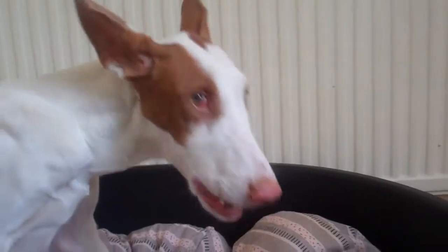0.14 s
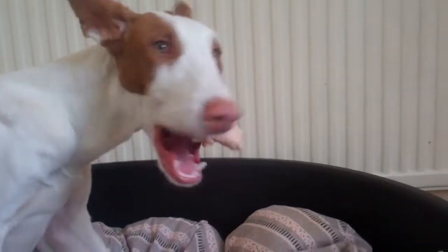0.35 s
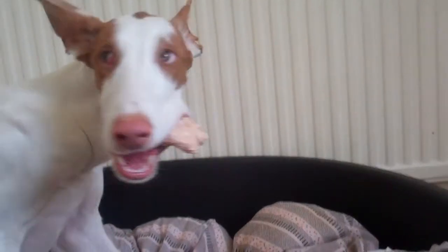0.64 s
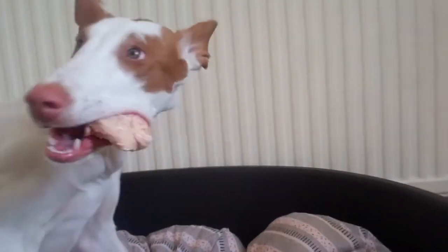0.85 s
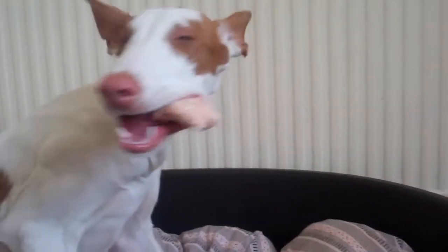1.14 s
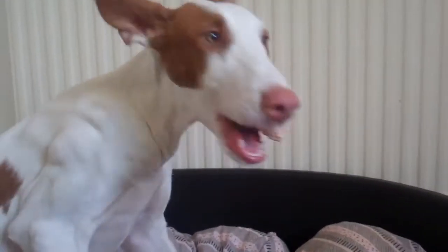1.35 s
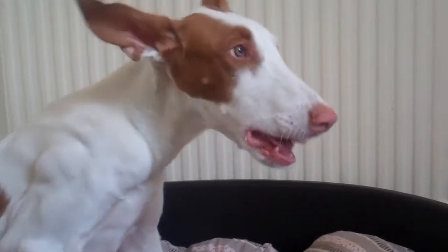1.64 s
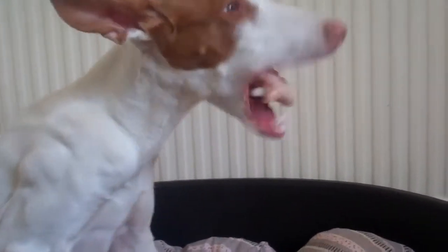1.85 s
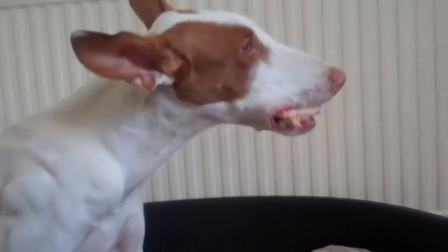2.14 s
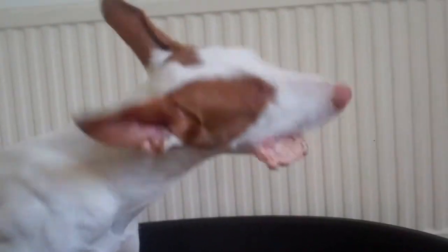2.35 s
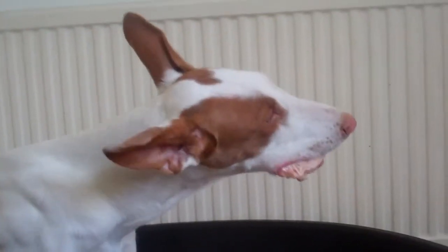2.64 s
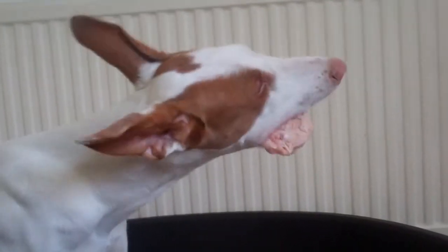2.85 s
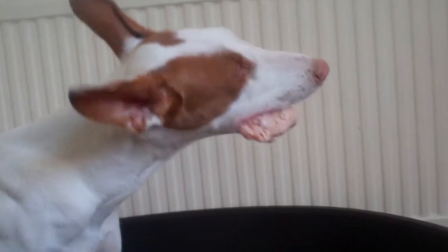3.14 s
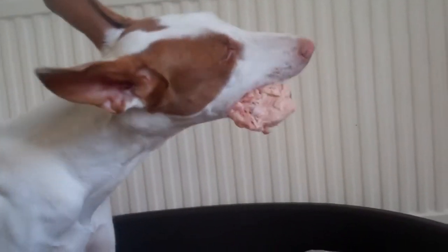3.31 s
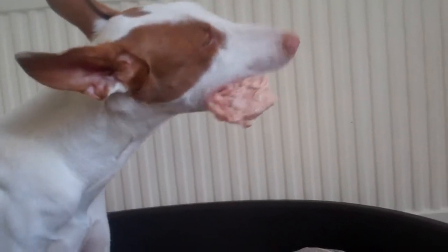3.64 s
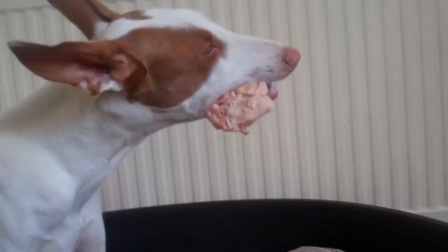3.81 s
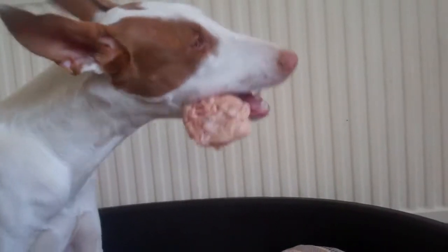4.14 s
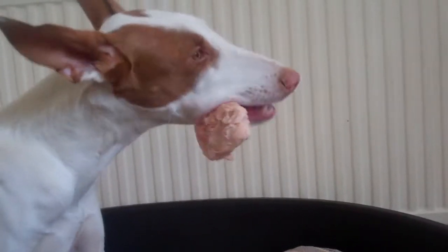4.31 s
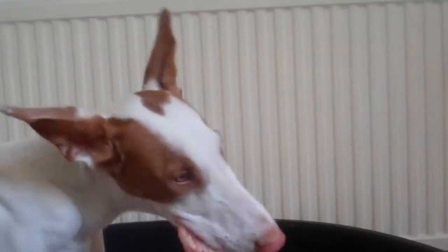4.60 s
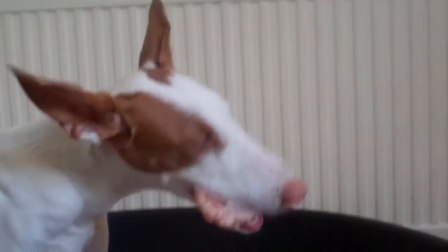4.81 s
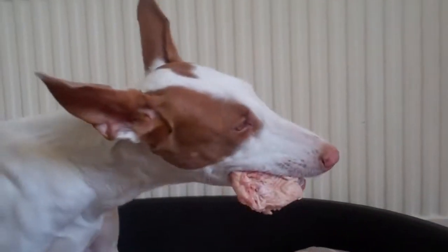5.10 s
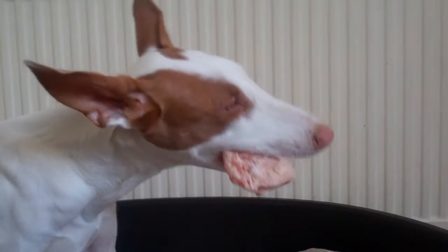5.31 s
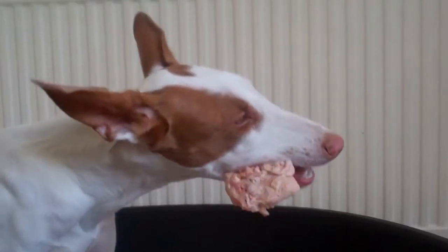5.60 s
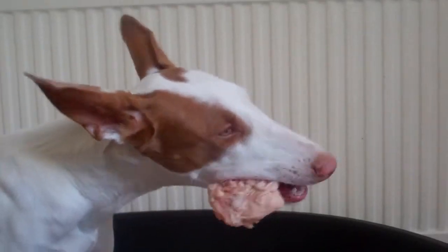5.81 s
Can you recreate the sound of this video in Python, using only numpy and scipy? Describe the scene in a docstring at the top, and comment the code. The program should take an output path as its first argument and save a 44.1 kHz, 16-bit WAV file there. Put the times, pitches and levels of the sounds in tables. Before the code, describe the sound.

A dog gnaws a hard frozen lump of meat, with scattered sharp cracks, small clicks, soft bedding rustle and one loud snap near the end.

```python
"""A dog in its plastic bed gnaws a lump of frozen meat, close to a small stereo camera in a living room.
Each bite is a burst of tiny breaks that rings the lump, its splinters and the mouth; the room answers briefly.
Bedding rustles as shaped noise and ticks, paws ring the bed's low modes and scrape its plastic,
and a hand rumbles on the camera. Underneath lie a faint mains hum and a steady hiss."""
import sys
import numpy as np
from scipy import signal
from scipy.fft import rfft, irfft, next_fast_len
from scipy.io import wavfile
from scipy.ndimage import uniform_filter1d

SR = 44100
rng = np.random.default_rng(int(sys.argv[2]) if len(sys.argv) > 2 else 0)


def store_pcm(level_fs):
    """Save levels as 16-bit WAV."""
    pcm = np.round(np.clip(level_fs, -1, 1) * 32767).astype(np.int16)
    wavfile.write(sys.argv[1], SR, np.atleast_2d(pcm).T)


N = 262836
T = np.arange(N) / SR  # time in seconds

# Bites that crack the lump or only knock on it.
# Each row: start in seconds, level in dB (before the overall level in bites), mouth thud in dB next to the lump,
# splinters in dB next to the lump, ring of the broken fragment in dB next to the lump,
# pitch of the fragment in Hz, pitch of the splinters in Hz, pitch of the mouth in Hz,
# crumbling time in seconds, level sent to the room in dB next to the crack.
BITES = [ (0.0296, -27.5, -15, 4, 1, 5400, 10100, 694, .0016, -8),
         (0.0303, -29.5, 3.5, -6, 5, 2400, 4500, 710, 0.0023, -8.5),
         (0.0331, -36, -7, -2, -1, 5400, 5400, 720, 0.0018, -6),
         (0.5361, -25.5, -32, -1.5, 4, 7040, 7200, 790, .0006, -13.5),
         (0.5372, -25, -27, -2, 12, 2930, 3100, 790, 0.00079, -13),
         (0.5386, -28.5, -10.5, -1, 8, 1630, 7700, 790, .0008, -13),
         (0.645, -43.5, -16, -14, 7, 5600, 6000, 790, 0.0015, -16),
         (0.775, -52, -15, 6, 0, 3200, 9000, 790, .003, -24),
         (0.7824, -43.5, -18, -7, 5, 6040, 6200, 790, .0008, -11),
         (0.7928, -47, -18, 11, 1, 4500, 11700, 790, .001, -11),
         (0.829, -40.5, -9, -3, 4, 2900, 4800, 790, .001, -21),
         (0.8302, -41, -16, 2, 6, 4750, 10500, 790, .001, -14),
         (0.8837, -54, 14, -10, 0, 1800, 4000, 260, .001, -16),
         (1.3512, -46.5, -3, 13.5, 6, 5600, 10300, 790, .0008, -2.5),
         (2.8017, -46.5, -24, 7.5, -3, 6540, 7000, 790, .001, 0),
         (2.8478, -46.5, 1.5, 7, -2, 2100, 4000, 855, .001, -2),
         (2.886, -44, -6, -8, 8, 2900, 4000, 790, .0033, -16),
         (3.2789, -36.5, 1.5, -14, 5, 1830, 3000, 970, 0.0035, -4.5),
         (3.287, -38, -10, -9, 2, 2880, 4500, 900, 0.0028, -12),
         (3.4214, -51.5, 14, -10, 0, 1800, 4000, 280, 0.0011, -10),
         (3.766, -40, -5, -9, 5, 1680, 9100, 905, .006, -7),
         (3.777, -43.5, -10, 7.5, 0, 3500, 9150, 900, 0.0096, -2),
         (3.8783, -37, -0.5, -2, -1, 3900, 4200, 960, .003, -4),
         (4.1628, -36, -5, -1, -5, 2380, 4300, 704, .0006, -3),
         (4.168, -30.5, -7.5, -9, -6, 2360, 3600, 806, 0.0089, -5),
         (4.191, -41.5, 8, -12, 4, 3150, 3500, 990, .004, -9),
         (4.273, -42.5, 10.5, -8, -2, 1840, 3000, 800, .0015, -1),
         (4.2937, -32.5, 12.5, -11, 3, 1490, 5000, 840, 0.0014, -7.5),
         (4.297, -28, -3, -11, -1, 1790, 5500, 830, 0.0022, -6),
         (4.3065, -35, 1.5, -11, -7, 1000, 4000, 885, 0.00089, -1),
         (4.3108, -36, 9.5, -9, 1, 1100, 4000, 950, 0.0009, -13),
         (4.316, -37, 5, -13, 2, 1800, 4000, 940, 0.00086, -8),
         (4.498, -47, 0, 5, 3, 2700, 8000, 790, .005, -4),
         (4.5062, -36, -6, 1.5, 10, 4270, 12000, 800, .0005, -8),
         (5.3745, -32.5, -17, -1, 0, 3300, 3500, 900, 0.00077, -17),
         (5.377, -31.5, -18, -21, 3, 2160, 8000, 900, 0.0011, -14),
         (5.3952, -43, -.5, 15.5, 3, 4130, 11500, 760, 0.0016, -10),
         (5.4007, -51, -8, 12, 0, 4500, 11500, 790, .002, -11),
         (5.412, -42.5, -10, -2, 0, 3600, 6000, 790, .002, -3),
         (5.49, -39, -21, -2, 2, 2170, 9000, 790, 0.0022, -16),
         (5.5022, -35, -35, 11.5, 2, 2600, 8400, 790, 0.00017, -11.5),
         (5.5042, -29, -25, -2, 11, 3370, 7300, 790, 0.0015, -12),
         (5.5279, -16.5, -3.5, 2, -5, 4400, 5950, 580, 0.00078, -6),
         (5.529, -19.5, -2, 2, -1, 2190, 5800, 830, 0.0027, -4),
         (5.5314, -28, -5, -7, 2, 1570, 4300, 980, 0.012, 6),
         (5.911, -36, 3, -5, 0, 3100, 5600, 790, .0023, -18),
         (5.926, -36.5, 6, 9, 3, 4520, 10600, 795, .0012, -24),
         (5.9385, -36.5, 6.5, -13, 0, 3200, 4000, 900, 0.0012, -8),
         (5.9457, -36, 7, -12, 3, 3410, 4000, 705, .002, -8),
         (5.9491, -41, 9, -14, 0, 1700, 4000, 910, .001, -10),
         (5.9535, -43, 11, -14, 0, 1390, 4000, 720, .001, -8)]
# How unlike a crack sounds at the two microphone ports. Each row: frequency in Hz, level in dB.
SIDEWAYS_COLOUR = [(500, -35), (2000, -35), (5000, -23), (9000, -9)]


def bites(level_db=-14, count=4):
    """Each crack sounds different in every direction: one reaches the camera, the others the walls."""
    front, aside, sent = np.zeros((3, N))
    for start_s, db, *shape, room_db in BITES:
        ways = [undb(db + level_db) * crack(*shape) for _ in range(count)]
        add(front, start_s, ways[0])
        add(aside, start_s + .0002, ways[1])
        for way in ways[1:]:
            add(sent, start_s, undb(room_db) * way / np.sqrt(count - 1))
    side = colour(aside, SIDEWAYS_COLOUR)
    return np.array([front + side, front - side]) + room(sent)


# The mouth around the lump, retuned by the jaw at every bite.
# Each row: multiple of the mouth's pitch, width in Hz, level in dB.
MOUTH_MODES = [(.25, 218, -9), (.7, 237, -7.5), (1, 165, 7), (1.2, 160, -11)]
# The frozen lump and the teeth. Each row: pitch in Hz before the grip shifts it, width in Hz, level in dB.
LUMP_MODES = [(1770, 120, 5.5), (2470, 570, 14), (3250, 900, 2.5), (4250, 1400, 2), (6060, 510, -6.5)]
# The crackle of the splinters. Each row: frequency in Hz, level in dB.
SPLINTER_COLOUR = [(2500, -25.5), (5000, -2), (6800, 0.5), (8000, 0.5), (10000, 0), (12400, 2)]
FRAGMENT_Q = 6  # sharpness: with the same Q, higher fragments ring more briefly
FLESH_HZ = 2100  # flesh softens the blow above this pitch
SPLINTER_RING_DB = -10.5  # the splinters' ring next to their crackle


def crack(thud_db, splinter_db, fragment_db, fragment_hz, splinter_hz, mouth_hz, crumble_s, size=2048):
    """One fracture sets off a dying run of smaller ones; they ring lump, fragment, splinters and mouth."""
    t = np.arange(size) / SR
    flips = rng.choice([-1, 1], size)
    keep = rng.random(size) < .3
    run = flips * keep * np.exp(-t / crumble_s)
    first = signal.unit_impulse(size)
    breaks = first + .4 * run

    # the teeth hold the lump differently each time
    grip = 1 + 0.064 * rng.uniform(-0.29, 1, len(LUMP_MODES))
    gripped = [(hz * shift, width, db) for (hz, width, db), shift in zip(LUMP_MODES, grip)]
    fragment = ring(breaks, [(fragment_hz, fragment_hz / FRAGMENT_Q, 0)])
    lump = unit(ring(breaks, gripped)) + undb(fragment_db) * unit(fragment)

    # the jaw mostly feels the first break, softened
    felt = first + .1 * run
    felt = signal.sosfilt(signal.butter(2, FLESH_HZ, fs=SR, output="sos"), felt)
    mouth_modes = [(multiple * mouth_hz, width, db) for multiple, width, db in MOUTH_MODES]
    mouth = undb(thud_db) * unit(ring(felt, mouth_modes))

    # the treble is spent sooner
    shards = first + 0.6 * run * np.exp(-t / (1.3 * crumble_s))
    crackle = unit(colour(shards, SPLINTER_COLOUR))
    splinter_ring = unit(ring(shards, [(splinter_hz, 1300, 0)]))
    splinters = crackle + undb(SPLINTER_RING_DB) * splinter_ring
    return bounce(unit(lump) + mouth + undb(splinter_db) * unit(splinters))


def bounce(x, size=13, reflect=.68):
    """All-pass filter: the shock runs to and fro inside the lump, which spreads its first spike."""
    taps = np.r_[1, np.zeros(size - 1), reflect]
    return signal.lfilter(taps[::-1], taps, x)


# The colour of the room's answer. Each row: frequency in Hz, level in dB.
ROOM_COLOUR = [(80, -34), (300, 1.5), (900, -1.5), (1700, 5.5), (4000, 3.5), (8000, 3.5), (12500, 3.5)]


def room(x, t60_s=0.28, gap_s=0.0041, size=22050):
    """Reflections arrive after a short gap and die away among the furniture."""
    t = np.arange(size) / SR
    fade_in = np.clip(t / gap_s - 1, 0, 1)
    tail = diffuse(ROOM_COLOUR, size=size, grain_db=1.0) * undb(-60 * t / t60_s) * fade_in
    return signal.fftconvolve(x[None], unit(tail) / np.sqrt(size), axes=1)[:, :N]


# The dog tugs and shifts on its blanket as it chews.
# Each row: height of the move in seconds, level in dB, length of the swell in seconds,
# fibre hiss in dB next to that level (before fibre_db in bedding).
MOVE_ROWS = [ (0.092, -44.5, 0.059, -6), (0.25, -50, 0.066, 3), (0.392, -54.5, 0.028, 7.5),
             (0.516, -46.5, 0.06, -0.5), (0.864, -48.5, 0.027, -22), (0.968, -44, 0.048, -5.5),
             (1.135, -46.5, 0.15, 0), (1.243, -53.5, 0.017, 8), (1.513, -43.5, 0.096, 0),
             (1.702, -46.5, 0.054, 1.5), (1.855, -47.5, 0.038, 5.5), (2.015, -42.5, 0.087, 2),
             (2.018, -40, 0.013, -6), (2.13, -42, 0.057, 3), (2.305, -55.5, .05, 6),
             (2.42, -44.5, 0.048, 5), (2.604, -55, 0.14, 6.5), (2.864, -55, 0.056, 0),
             (3.014, -57, 0.074, 2.5), (3.337, -49.5, 0.097, 4), (3.513, -46, 0.06, 4.5),
             (3.72, -51.5, 0.05, -2), (3.922, -45, 0.11, 2), (4.154, -43, 0.039, 1.5),
             (4.284, -49, .012, 9), (4.335, -43, 0.085, -1.5), (4.603, -49.5, 0.024, 0.5),
             (4.742, -55.5, 0.06, 3), (4.892, -51, 0.044, 6.5), (5.073, -55.5, 0.085, 10.5),
             (5.208, -52.5, 0.044, 6.5), (5.397, -54, 0.044, 5.5), (5.662, -50.5, 0.14, 4.5)]
# The rub of the cloth. Each row: frequency in Hz, level in dB.
CLOTH_COLOUR = [(150, -30), (270, -7.5), (400, -13), (800, -1), (1300, -2.5), (2200, -1), (3200, -3),
                (4500, -10), (7000, -16)]
# The hiss of the fibres. Each row: frequency in Hz, level in dB.
FIBRE_COLOUR = [(1500, -14), (3500, -3), (5000, -3.5), (7000, -3.5), (9500, -4), (12000, -3)]
# Threads that catch and snap free. Each row: frequency in Hz, level in dB.
SNAG_COLOUR = [(250, -10), (800, 1), (2500, -1), (5000, -14.5), (12000, -14)]
# average snags per second, their level next to the rub and the spread of their sizes
SNAGS_PER_S, SNAG_DB, SNAG_SPREAD_DB = 300, -9.5, 2
# the blanket is never quite still: resting rub, and resting hiss before fibre_db
REST_RUB_DB, REST_HISS_DB = -60.5, -55


def bedding(fibre_db=2.02):
    """Countless fibres catch and slip as the dog moves; the rustle is patchy in colour and single threads tick."""
    rub = strokes([(s, db, length_s) for s, db, length_s, _ in MOVE_ROWS], REST_RUB_DB)
    hiss = strokes([(s, db + hiss_db, length_s) for s, db, length_s, hiss_db in MOVE_ROWS], REST_HISS_DB)
    catch_db = 0.62 * walk(70)
    patchy_rub = patchy(diffuse(CLOTH_COLOUR), depth_db=5.5, hold_s=0.029)
    patchy_rub = patchy(patchy_rub, depth_db=0.5, size=256, hold_s=0.011)
    snags = undb(SNAG_DB) * ticks(SNAGS_PER_S, SNAG_COLOUR, spread_db=SNAG_SPREAD_DB)
    cloth = (patchy_rub + snags) * rub * undb(catch_db)
    fibres = patchy(diffuse(FIBRE_COLOUR), depth_db=8.0, hold_s=0.055)
    return cloth + fibres * hiss * undb(fibre_db + catch_db)


# Paws land on the bed and slide.
# Each row: landing in seconds, thump in dB (before the bass is trimmed), slide in dB, length of the slide in seconds.
PAW_STEPS = [ (0.085, -70, -52.5, 0.027), (0.384, -64, -50, 0.014), (1.336, -52.5, -54, 0.033),
             (1.97, -60, -54.5, .03), (2.182, -58, -51.5, 0.035), (3.072, -54, -60.5, 0.067),
             (3.359, -54, -51, 0.015), (3.421, -47.5, -50, 0.023), (3.541, -50, -51, 0.033),
             (4.043, -40, -51.5, 0.038), (4.223, -54, -53, 0.19), (5.617, -46.5, -52, 0.037),
             (5.686, -42, -59, 0.024), (5.721, -46, -54.5, 0.032), (5.822, -45, -50, 0.029),
             (5.886, -25.5, -38, 0.012), (5.932, -27.5, -30.5, 0.014)]
# The bed and the floor under it. Each row: pitch in Hz before a small detune, level in dB, time to fall 60 dB in seconds.
BED_MODES = [(99, -4.5, 0.8), (149, -1, 0.25), (165.5, 5.5, 0.16), (193, -1, 0.12), (241, 0, 0.31),
             (278.5, -7.5, 0.18), (398, -15, 0.27), (550, -18, .15)]


def thumps(contact_s=0.0022, size=13230):
    """Soft blows ring the low modes of the bed, a little differently each time."""
    out, t = np.zeros(N), np.arange(size) / SR
    soft_start = 1 - np.exp(-t / contact_s)
    for start_s, db, *_ in PAW_STEPS:
        detune = 1 + .02 * rng.standard_normal(len(BED_MODES))
        body = np.zeros(size)
        for (hz, mode_db, t60_s), shift in zip(BED_MODES, detune):
            body += undb(mode_db - 60 * t / t60_s) * np.cos(2 * np.pi * hz * shift * t)
        add(out, start_s, undb(db) * body * soft_start)
    # so small a bed radiates little deep bass
    return colour(out, [(30, -10), (65, -21), (100, -5.5), (200, -1.5)], size=4096)


# The rumble of the bed's shell. Each row: frequency in Hz, level in dB.
SHELL_COLOUR = [(50, -32), (90, -20), (150, -5), (240, 5.5), (330, 3.5), (520, 7), (800, -34), (1500, -44)]
# The rasp of the contact. Each row: frequency in Hz, level in dB.
GRIT_COLOUR = [(250, -71), (550, 5.5), (1000, 3), (1500, -0.5), (2500, -5), (4500, -17.5), (12000, -19.5)]
SLIDE_LAG_S, GRIT_DB = 0.022, -0.5  # a slide peaks this long after the landing; its rasp next to its rumble
SLIPS_PER_S, SLIP_DB = 420, -3.5  # average jerks of a claw over the plastic; their level next to the rumble
DRAG_DB = -15.5  # share of each move that drags on the shell of the bed


def scuffs():
    """A sliding paw or a dragged blanket judders: the shell of the bed rumbles and the contact rasps."""
    slides = [(s + SLIDE_LAG_S, db, length_s) for s, _, db, length_s in PAW_STEPS]
    drags = [(s, db + DRAG_DB, length_s) for s, db, length_s, _ in MOVE_ROWS]
    push = strokes(slides + drags) * undb(1.05 * walk(70))
    rumble = diffuse(SHELL_COLOUR)
    rasp = undb(GRIT_DB) * diffuse(GRIT_COLOUR)
    slips = undb(SLIP_DB) * ticks(SLIPS_PER_S, GRIT_COLOUR)
    return push * (rumble + rasp + slips)


# The hand shifting on the camera. Each row: height of the move in seconds, level in dB, length of the swell in seconds.
HAND_MOVES = [(3.08, -62, 0.026), (3.58, -54, 0.044)]
# The rumble of the case. Each row: frequency in Hz, level in dB.
CASE_COLOUR = [(25, -16), (50, -3), (70, 8), (100, -7), (160, -22)]


def handling():
    """Deep rumbles come through the case of the camera."""
    return sum(stroke(*row) for row in HAND_MOVES) * diffuse(CASE_COLOUR)


# The mains hum. Each row: pitch in Hz, level in dB.
HUM_TONES = [(119.8, -63.5), (240, -82), (360, -71)]
# The steady noise of the room. Each row: frequency in Hz, level in dB.
AIR_COLOUR = [(25, -11), (45, 9), (80, 8.5), (160, 10.5), (350, 10.5), (900, 13), (2000, -18), (5000, -34),
              (12000, 2.5)]


def background(air_db=-57):
    """Mains hum as steady sine tones, and the steady hiss of a quiet room as coloured noise."""
    hum = np.zeros(N)
    for hz, db in HUM_TONES:
        hum += undb(db) * np.sqrt(2) * np.sin(2 * np.pi * (hz * T + rng.random()))
    return hum + undb(air_db) * diffuse(AIR_COLOUR)


# How alike the two microphone ports hear sound from all round. Each row: frequency in Hz, correlation (1 = identical).
PORT_LIKENESS = [(100, 0.79), (400, 0.94), (1000, 0.91), (2000, 0.61), (3500, 0.15), (6000, 0.11),
                 (9000, 0.47), (12000, 0.42)]


def diffuse(points, size=N, grain_db=0):
    """Coloured noise from all round at the two ports; grain_db makes single grains stand out."""
    n = next_fast_len(size, True)
    grains = undb(grain_db * np.repeat(rng.standard_normal(n // 16 + 1), 16)[:n])
    mid, side = rfft(rng.standard_normal((2, n)) * grains)
    alike = np.clip(along(PORT_LIKENESS, n), -1, 1)
    mid, side = mid * np.sqrt(1 + alike), side * np.sqrt(1 - alike)
    spectra = np.array([mid + side, mid - side]) * undb(along(points, n))
    return unit(irfft(spectra, n)[:, :size])


def patchy(x, depth_db, size=1024, hold_s=0.03):
    """Random dips and small rises in level per band and moment, alike at both ports."""
    spectra = signal.stft(x, nperseg=size)[2]
    field = uniform_filter1d(rng.standard_normal(spectra.shape[1:]), size=3, axis=0)  # smooth across bands
    field = signal.lfilter([1], [1, -np.exp(-size / 2 / SR / hold_s)], field)  # smooth in time
    gain = undb(depth_db * np.minimum(unit(field), 1))  # rises are capped, dips are not
    return unit(signal.istft(spectra * gain, nperseg=size)[1][:, :N])


def ticks(per_s, points, spread_db=3.5):
    """Tiny coloured clicks of uneven size at random moments, some to the left and some to the right."""
    chance = rng.random(N)
    size = np.clip(rng.standard_normal(N), -2, 2)
    place = rng.uniform(-0.99, 1, N)
    clicks = (chance < per_s / SR) * undb(spread_db * size)
    return unit(np.array([colour(clicks * (1 + way * 0.44 * place), points) for way in (1, -1)]))


EASE_OFF = 1.52  # a move dies away this many times more slowly than it swells


def stroke(s, db, length_s):
    """A movement that swells and eases off a little more slowly."""
    width_s = length_s * np.where(T < s, 1, EASE_OFF)
    return undb(db) * np.exp(-.5 * ((T - s) / width_s) ** 2)


def strokes(rows, rest_db=-np.inf):
    """Overlapping movements (seconds, dB, length in seconds) add in power, over a resting level."""
    return np.sqrt(undb(rest_db) ** 2 + sum(stroke(*row) ** 2 for row in rows))


def walk(rate):
    """Random levels held 1 / rate seconds and smoothed into ramps; rms 1."""
    k = int(SR / rate)
    return unit(uniform_filter1d(np.repeat(rng.standard_normal(N // k + 1), k), k)[:N])


def ring(x, modes):
    """Drive a set of resonances (pitch in Hz, width in Hz, dB)."""
    return sum(undb(db) * signal.lfilter(*signal.iirpeak(hz, hz / width, fs=SR), x) for hz, width, db in modes)


def colour(x, points, size=1024):
    """Filter to the given spectrum with minimum phase, so nothing sounds before its cause."""
    cepstrum = irfft(np.log(undb(along(points, size))))
    cepstrum[1:size // 2] *= 2
    cepstrum[size // 2 + 1:] = 0
    return signal.fftconvolve(x, irfft(np.exp(rfft(cepstrum))))[:len(x)]


def along(points, size):
    """Read (Hz, value) points at the bins of a transform, on a log-frequency axis."""
    hz, value = np.transpose(points)
    bins_hz = np.arange(size // 2 + 1) * SR / size
    return np.interp(np.log(bins_hz + 1), np.log(hz), value)


def add(track, s, sound):
    """Mix a sound in at time s."""
    start = max(int(s * SR), 0)
    part = sound[..., :max(N - start, 0)]
    track[..., start:start + part.shape[-1]] += part


def undb(db):
    """Decibels to gain."""
    return 10 ** (np.asarray(db) / 20)


def unit(x):
    """Scale to rms 1."""
    return x / np.sqrt(np.mean(x ** 2))


def scene():
    """Everything at the two ports."""
    return bites() + bedding() + thumps() + scuffs() + handling() + background()


TOP_HZ = 12500  # the camera cuts off above this


def record(dry):
    """The left port is a little keener in the treble; the camera cuts the top steeply."""
    left = colour(dry[0], [(2000, 0), (4000, 1), (12000, 1.3)])
    return signal.sosfilt(signal.ellip(10, .2, 70, TOP_HZ, fs=SR, output="sos"), [left, dry[1]])


dry = scene()
out = record(dry)
store_pcm(out)
```